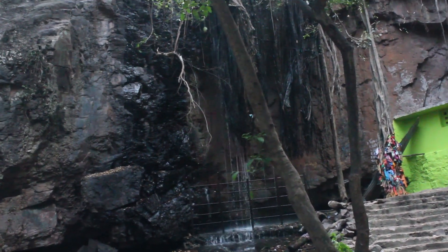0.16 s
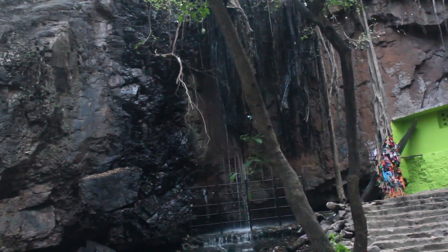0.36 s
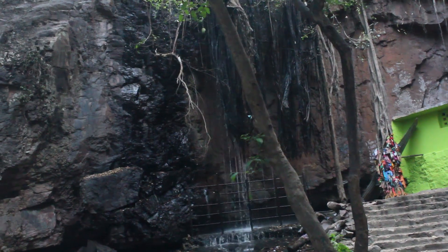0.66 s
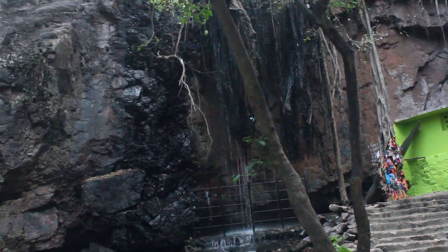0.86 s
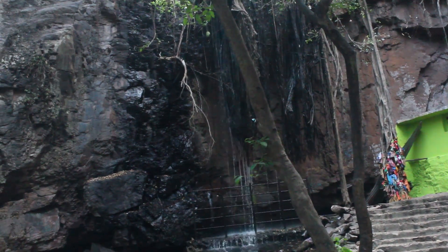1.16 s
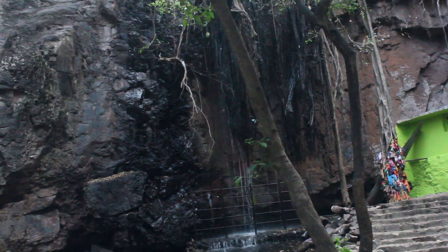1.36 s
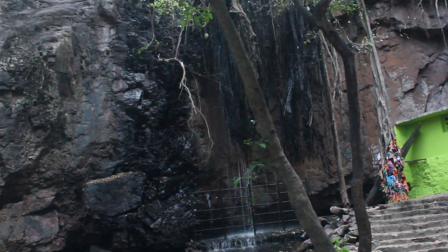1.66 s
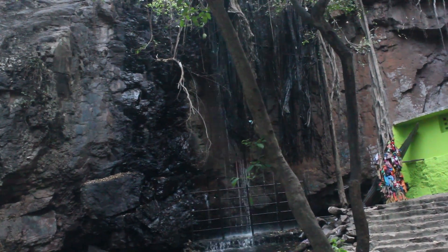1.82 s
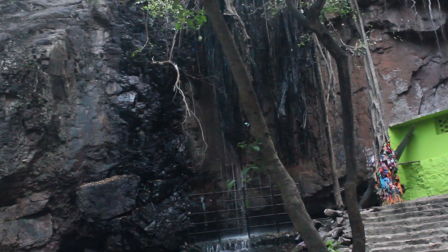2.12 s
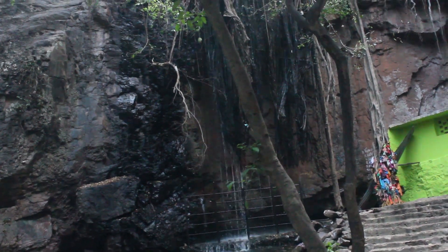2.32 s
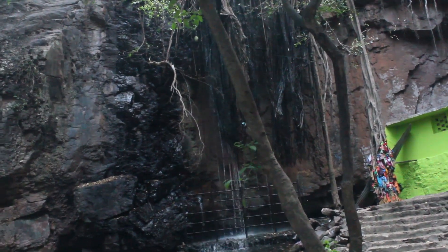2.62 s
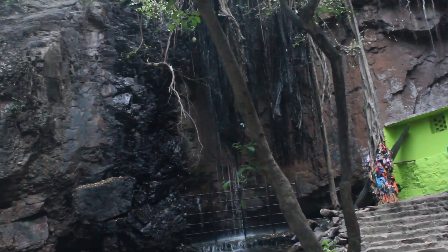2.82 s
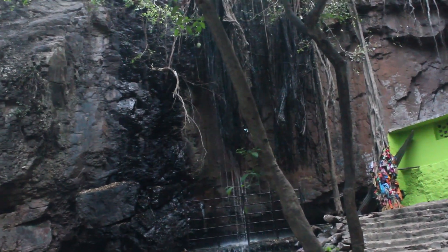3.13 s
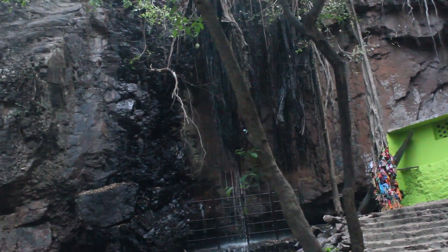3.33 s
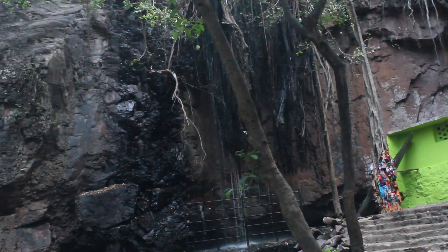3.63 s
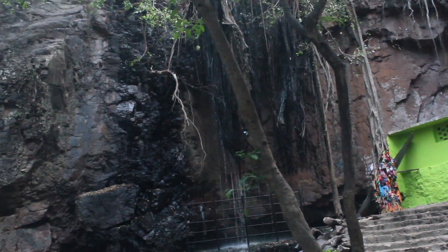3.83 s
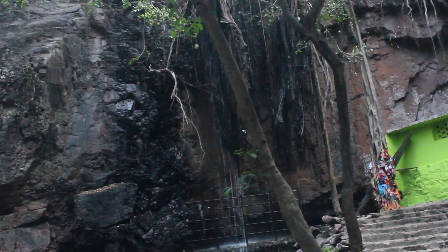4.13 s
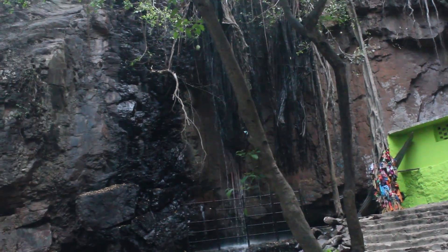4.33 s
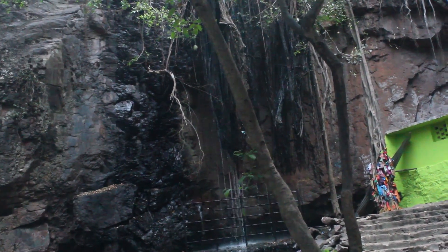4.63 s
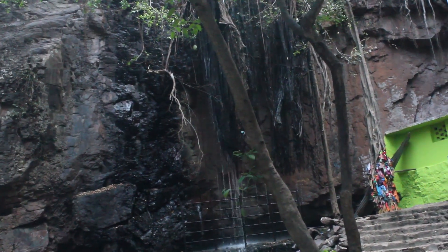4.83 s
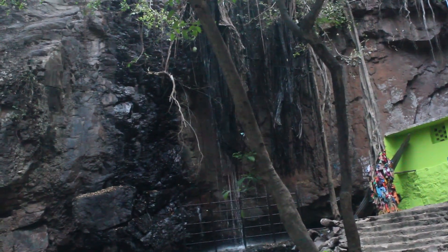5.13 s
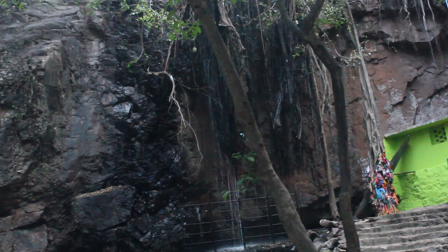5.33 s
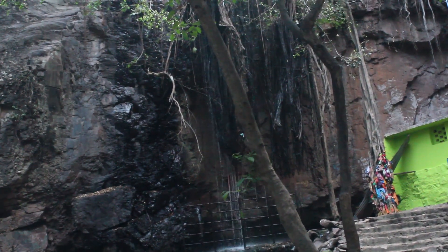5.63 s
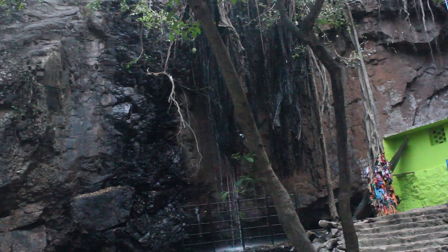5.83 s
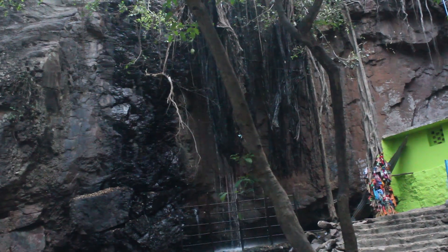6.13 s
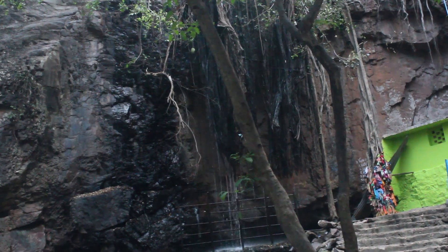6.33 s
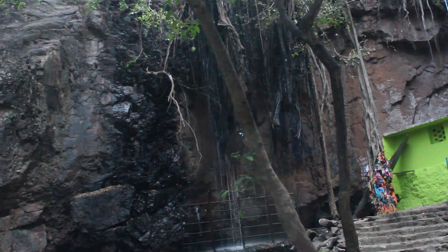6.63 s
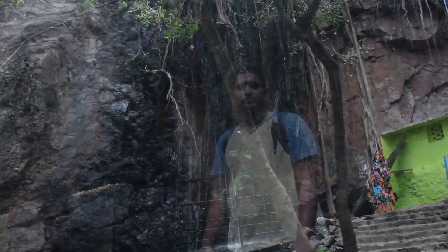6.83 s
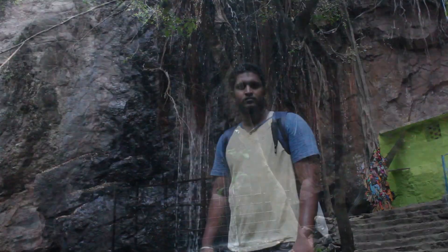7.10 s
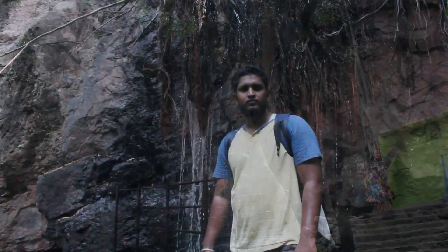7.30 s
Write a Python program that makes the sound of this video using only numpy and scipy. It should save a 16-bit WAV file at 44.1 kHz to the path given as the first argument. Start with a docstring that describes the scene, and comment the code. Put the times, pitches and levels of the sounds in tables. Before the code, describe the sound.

From 0 seconds a thin waterfall runs steadily down a rock face into a shallow pool, heard in mono from across the water. The sound is a dense, fairly bright rush with little bass, finely grained by single drops ticking on wet stone, small slaps and faint bubbles ringing with slightly rising pitch. The rock wall adds a short diffuse reflection. The level stays nearly constant, with only slight flicker. Between about 2.3 and 3.7 seconds very faint, low puffs of breeze brush the microphone, strongest near 3.2, mostly hidden beneath the water. From about 6.1 seconds the rush fades smoothly, reaching silence near 7.1. At that moment a soft, dull low bump sounds and the water suddenly returns from close by, crisper and brighter, with more distinct spatter, swelling steadily until it cuts off shortly afterward.

```python
"""A steady rush is heard first: a thin waterfall on a rock face, above a shallow pool, in mono.
The rush is shaped noise, for countless merged drops; random impulses give single drops and slaps on stone.
Trapped bubbles are decaying sines of rising pitch; a breeze on the microphone is low noise in slow puffs.
The fall fades away, then returns from close by with a soft bump (low noise), brighter and swelling."""
import sys
import numpy as np
from scipy import signal
from scipy.fft import rfft, irfft
from scipy.io import wavfile
from scipy.ndimage import uniform_filter1d

SR = 44100
rng = np.random.default_rng(int(sys.argv[2]) if len(sys.argv) > 2 else 0)


def file_out(sig):
    """Save sig as 16-bit WAV at sys.argv[1]."""
    # one column per channel
    cols = np.atleast_2d(sig).T
    # limit, then scale
    lim = np.clip(cols, -1, 1)
    pcm = np.round(lim * 32767).astype(np.int16)
    wavfile.write(sys.argv[1], SR, pcm)


N = 328986  # length in samples

# Spectrum of the rush from across the pool. Each row: frequency in Hz, relative density in dB per Hz.
FAR_RUSH = [(25, -45), (60, -40), (100, -36), (135, -32), (180, -20), (235, -18), (290, -15), (470, -11),
            (660, -4.5), (890, -5.5), (1560, -0.67), (3600, -2), (5300, -0.96), (7200, 0.27)]
# Spectrum of the rush beside the falling water. Each row: frequency in Hz, relative density in dB per Hz.
NEAR_RUSH = [(25, -46), (100, -35.5), (200, -23.5), (420, -16), (610, -13.5), (830, -8), (1320, -6.5),
             (1900, -3.7), (2550, -4), (4200, -4), (6200, -1), (7600, -0.2), (9500, 0.5), (12500, 3)]
# Stronger puffs of breeze on the microphone. Each row: time of the peak in seconds, level in dB.
PUFFS = [(2.36, -68), (3.02, -63), (3.24, -59.5), (3.33, -66), (3.62, -70)]
# Spectrum of the breeze. Each row: frequency in Hz, relative density in dB per Hz.
BREEZE_SPECTRUM = [(10, -8), (25, -3), (55, 0), (80, -6), (120, -3), (200, -24), (500, -70)]
# Sizes of the bubbles in the pool. Each row: starting ring pitch in Hz, relative ring level in dB.
BUBBLE_SIZES = [(280, -12.5), (450, -7), (650, 0), (900, 1), (1500, 3.5), (2500, 6), (5000, -0.5)]
# Spectrum of the dull bump. Each row: frequency in Hz, relative density in dB per Hz.
BUMP_SPECTRUM = [(40, -32), (100, -26), (150, -16), (230, 0), (300, -9), (450, -9), (1500, -60)]

FAR_DB, NEAR_DB = -23, -20  # gain of each view of the fall
FADE_START_S, MOVE_TIME_S = 6.12, 7.132  # the far sound starts to fade; the near sound begins
SWELL_START_DB, SWELL_DB_PER_S = -1.9, 13.5  # the near water grows steadily louder
PUFF_HALF_S = .035  # Gaussian width (standard deviation) of every puff
GUST_TIME_S, GUST_HALF_S, GUST_DB, GUST_LUMPY_DB = 3.15, .45, -77, 2.5  # the weak gust carrying the puffs
BUMP_DB, BUMP_RISE_S = -40.5, .012
TREBLE_KNEE_HZ, TREBLE_SLOPE_DB = 7656, 41.5  # microphone loss in dB per octave above the knee
EDGE_HZ = 15200  # upper limit of the recorder's band


def gain_of(db):
    """Logarithmic level: 20 dB is a factor of ten in amplitude."""
    return 10 ** (np.asarray(db) / 20)


def evened(x):
    """Normalization: scales a signal to a root-mean-square of one."""
    return x / np.sqrt(np.mean(x ** 2) + 1e-20)


def read(points, hz):
    """Logarithmic interpolation: reads a spectrum in dB along a log-frequency axis."""
    f, value = np.transpose(points)
    return np.interp(np.log(hz + 1), np.log(f + 1), value)


def coloured(x, points):
    """Linear filtering: shapes x by a spectrum and the microphone's treble roll-off, at an rms of one."""
    hz = np.fft.rfftfreq(N, 1 / SR)
    octaves_above_knee = np.log2(np.maximum(hz / TREBLE_KNEE_HZ, 1))
    response_db = read(points, hz) - TREBLE_SLOPE_DB * octaves_above_knee
    return evened(irfft(rfft(x) * gain_of(response_db), N))


def impacts(per_s, spread_db):
    """Poisson-like arrivals: random impulses of either sign, most of them small and a few large."""
    chance, size, sign = rng.random((3, N))
    size = np.minimum(-np.log(1 - size), 4)  # exponential distribution, capped
    arrives = chance < per_s / SR
    return arrives * gain_of(spread_db * size) * np.sign(sign - .5)


def rock_face(x, wet_db, t60):
    """Diffuse reflection: the rock wall scatters a short decaying tail back over the pool."""
    t = np.arange(SR // 2) / SR
    sparse = rng.random(len(t)) < 1 / 20
    late = t > .008  # seconds before the first reflection
    decay = gain_of(-60 * t / t60)
    taps = rng.standard_normal(len(t)) * sparse * late * decay
    tail = signal.fftconvolve(x, taps / np.linalg.norm(taps))[:N]
    return x + gain_of(wet_db) * tail


def ground_bounce(x, delay_s, echo_db):
    """Interference: an early ground reflection ripples the low and middle of the spectrum."""
    hz = np.fft.rfftfreq(N, 1 / SR)
    treble_loss = 1 / (1 + (hz / 2500) ** 4)
    echo = gain_of(echo_db) * np.exp(-2j * np.pi * hz * delay_s) * treble_loss
    return irfft(rfft(x) * (1 + echo), N)


def breeze(t):
    """Wind noise on the microphone: low noise modulated by one slow, uneven gust and stronger puffs."""
    lumps = evened(uniform_filter1d(rng.standard_normal(N), size=4000))
    gust_shape = np.exp(-.5 * ((t - GUST_TIME_S) / GUST_HALF_S) ** 2)
    gust = gain_of(GUST_DB + GUST_LUMPY_DB * lumps) * gust_shape
    puffs = sum(gain_of(db) * np.exp(-.5 * ((t - peak_s) / PUFF_HALF_S) ** 2) for peak_s, db in PUFFS)
    return (gust + puffs) * coloured(rng.standard_normal(N), BREEZE_SPECTRUM)


def bump(t):
    """Transient envelope: a dull low knock rises and dies within a few hundredths of a second."""
    age = np.maximum(t - MOVE_TIME_S, 0) / BUMP_RISE_S
    envelope = age * np.exp(1 - age)  # peaks at one when age is one
    return gain_of(BUMP_DB) * envelope * coloured(rng.standard_normal(N), BUMP_SPECTRUM)


def bubbles(per_s, spread_db, cycles, rise, count=48):
    """Bubble resonance: trapped air rings for some cycles, its pitch rising as it nears the surface."""
    t, pool = np.arange(SR // 12) / SR, np.zeros(N)
    for hz in np.geomspace(BUBBLE_SIZES[0][0], BUBBLE_SIZES[-1][0], count):
        age = t * hz / cycles  # in decay times
        pitch = hz * (1 + rise * np.minimum(age, 4))
        envelope = np.exp(-age) * (1 - np.exp(-t * hz))
        ring = np.sin(2 * np.pi * np.cumsum(pitch) / SR) * envelope
        # small bubbles are more common than large ones
        births = impacts(per_s / count * hz / 1000, spread_db)
        pool += gain_of(read(BUBBLE_SIZES, hz)) * signal.oaconvolve(births, ring)[:N]
    return evened(rock_face(pool, wet_db=-4, t60=0.37))


def drops(colour, per_s, spread_db):
    """Impulse excitation: single drops tick on the wet stone."""
    return coloured(rock_face(impacts(per_s, spread_db), wet_db=-5, t60=0.26), colour)


def slaps(colour, per_s, spread_db, decay_s):
    """Decaying noise bursts: clumps of water hit the stone, each with a quickly dying spatter."""
    t = np.arange(SR // 10) / SR
    power_decay = np.exp(-2 * t / decay_s)
    power = signal.fftconvolve(impacts(per_s, spread_db) ** 2, power_decay)[:N]
    spatter = np.sqrt(abs(power)) * rng.standard_normal(N)
    return coloured(rock_face(spatter, wet_db=-5, t60=0.26), colour)


def spray(colour, patchy_db, flicker_db, surge_db):
    """Superposition: merged droplets form noise; the uneven stream makes it flicker in patches and surge."""
    frames = dict(nperseg=512, noverlap=384)
    hz, t, z = signal.stft(rng.standard_normal(N), SR, **frames)
    patches = uniform_filter1d(rng.standard_normal(z.shape), size=9, axis=0)  # across frequency
    patches = uniform_filter1d(patches, size=14, axis=1)  # across time
    flicker = uniform_filter1d(rng.standard_normal(len(t)), size=6)
    surge = uniform_filter1d(rng.standard_normal(len(t)), size=50)
    level_db = patchy_db * evened(patches) + flicker_db * evened(flicker) + surge_db * evened(surge)
    hiss = signal.istft(z * gain_of(level_db), **frames)[1][:N]
    return coloured(hiss, colour)


def scene():
    """Superposed sources: the fall from across the pool fades out, then is heard from close by."""
    t = np.arange(N) / SR
    pool = gain_of(-13.5) * bubbles(per_s=650, spread_db=2.5, cycles=7.1, rise=.04)

    far = spray(FAR_RUSH, patchy_db=.8, flicker_db=.17, surge_db=.11) + pool
    far += gain_of(-9.5) * slaps(FAR_RUSH, per_s=250, spread_db=1.5, decay_s=0.0035)
    far += gain_of(-11.5) * drops(FAR_RUSH, per_s=1800, spread_db=3.5)
    far = ground_bounce(far, delay_s=0.0019, echo_db=-23)

    near = spray(NEAR_RUSH, patchy_db=.9, flicker_db=.25, surge_db=.08) + gain_of(-4) * pool
    near += gain_of(-13.5) * slaps(NEAR_RUSH, per_s=400, spread_db=4.5, decay_s=0.0022)
    near += gain_of(-12.5) * drops(NEAR_RUSH, per_s=1800, spread_db=4.5)

    fade_left = np.clip((MOVE_TIME_S - t) / (MOVE_TIME_S - FADE_START_S), 0, 1)
    fade = np.sin(np.pi / 2 * fade_left)
    swell = gain_of(SWELL_START_DB + SWELL_DB_PER_S * (t - MOVE_TIME_S)) * (t >= MOVE_TIME_S)
    mono = gain_of(FAR_DB) * far * fade + gain_of(NEAR_DB) * near * swell
    mono += breeze(t) + bump(t)
    return np.array([mono, mono])


def record(dry):
    """Band limitation: the recorder passes only frequencies below its upper edge."""
    low_pass = signal.firwin(511, EDGE_HZ, window=("kaiser", 9), fs=SR)
    return signal.oaconvolve(dry, low_pass[None], "same")


dry = scene()
out = record(dry)
file_out(out)
```